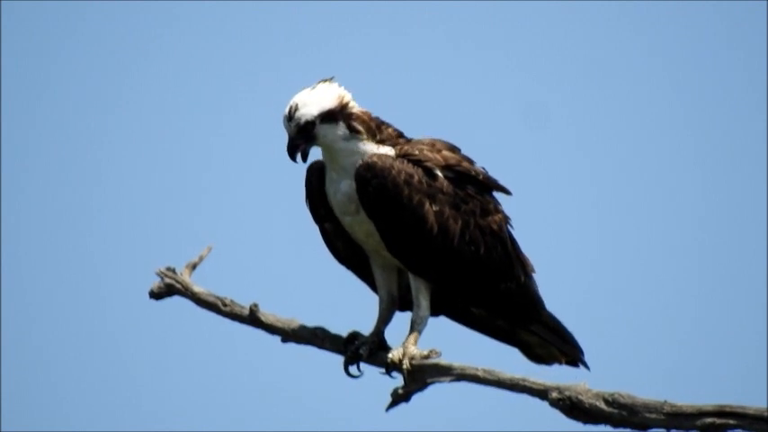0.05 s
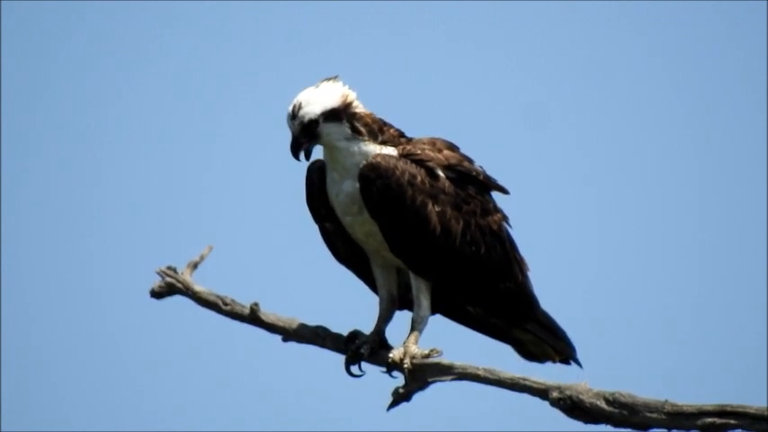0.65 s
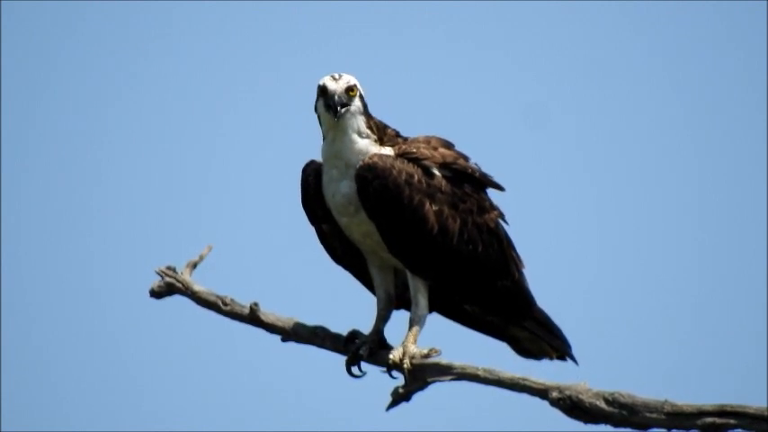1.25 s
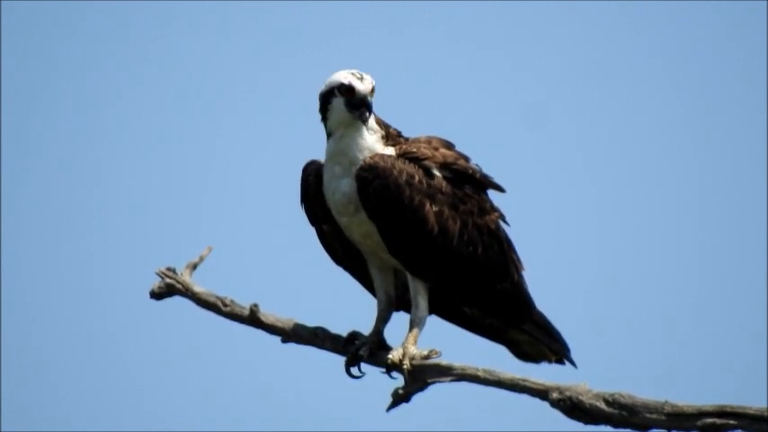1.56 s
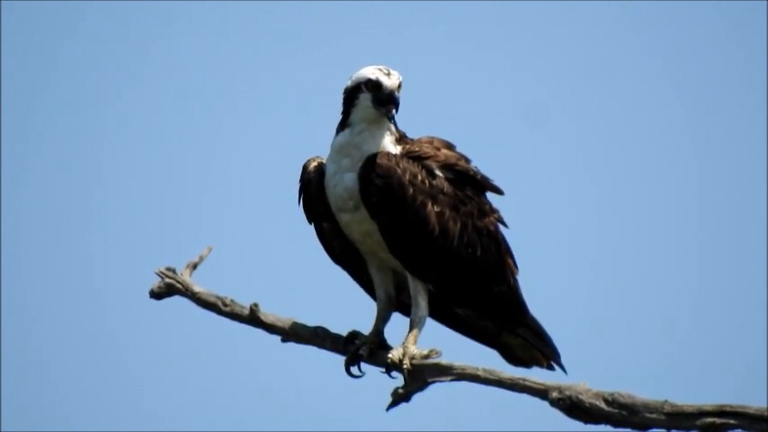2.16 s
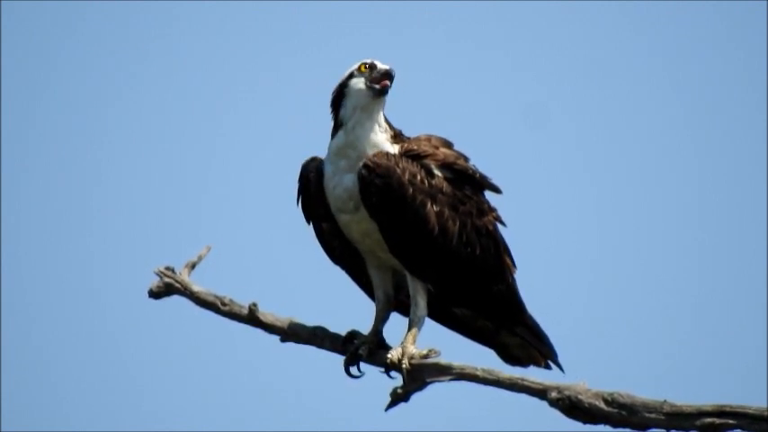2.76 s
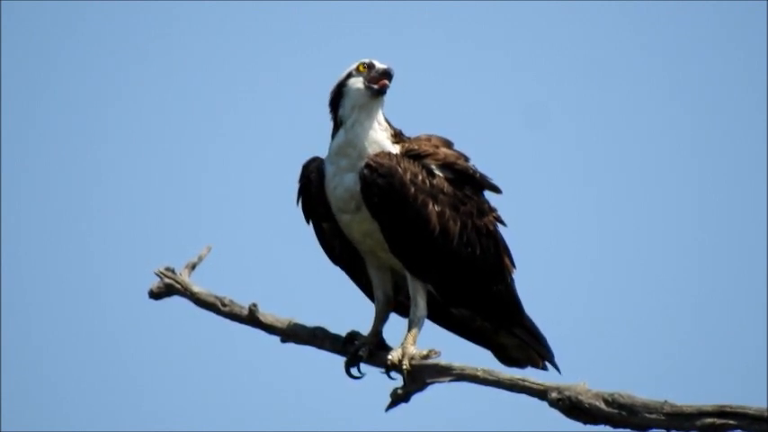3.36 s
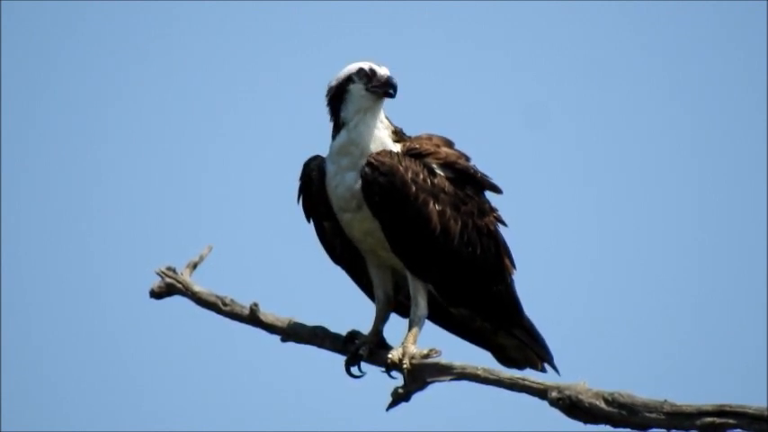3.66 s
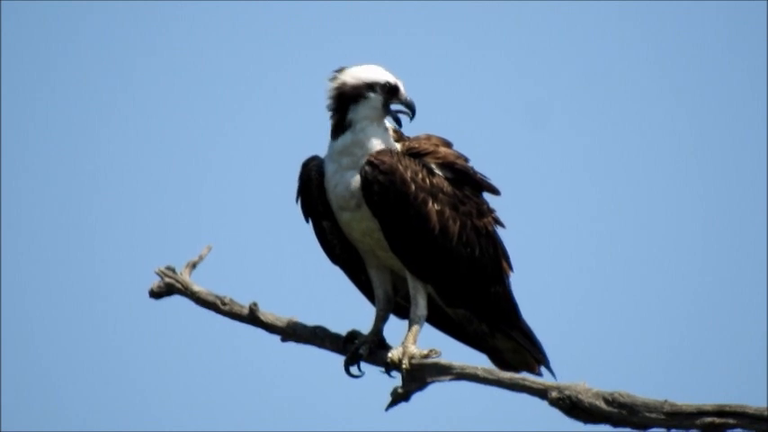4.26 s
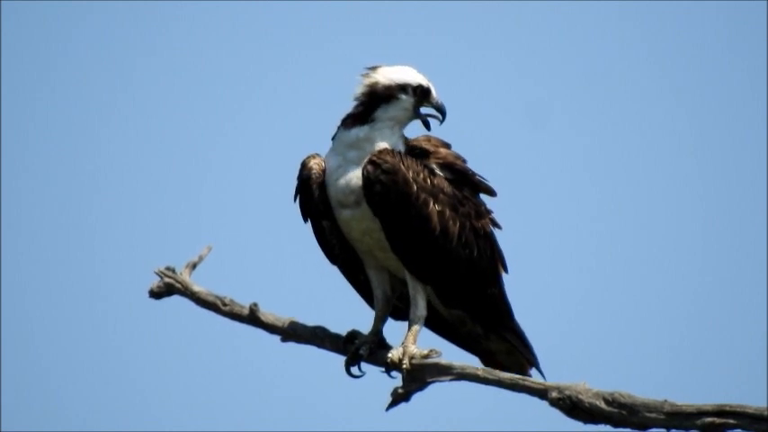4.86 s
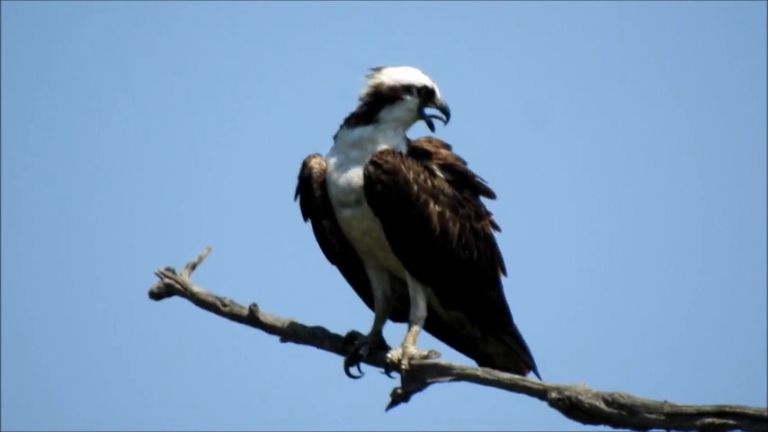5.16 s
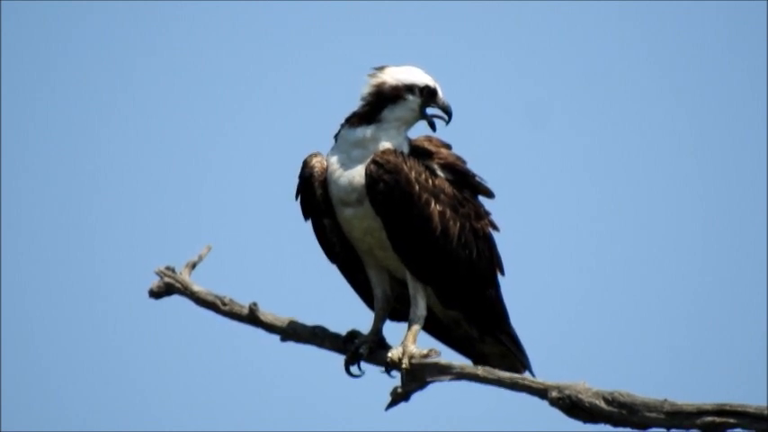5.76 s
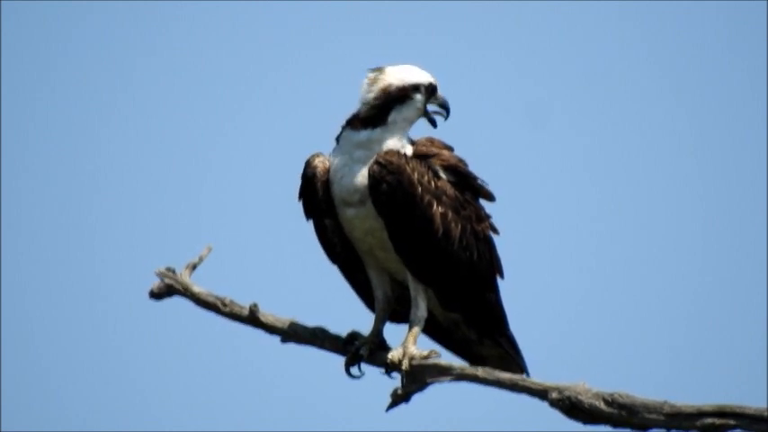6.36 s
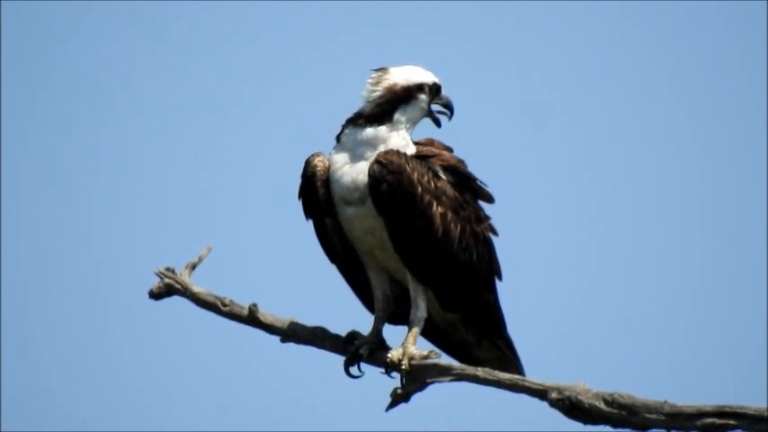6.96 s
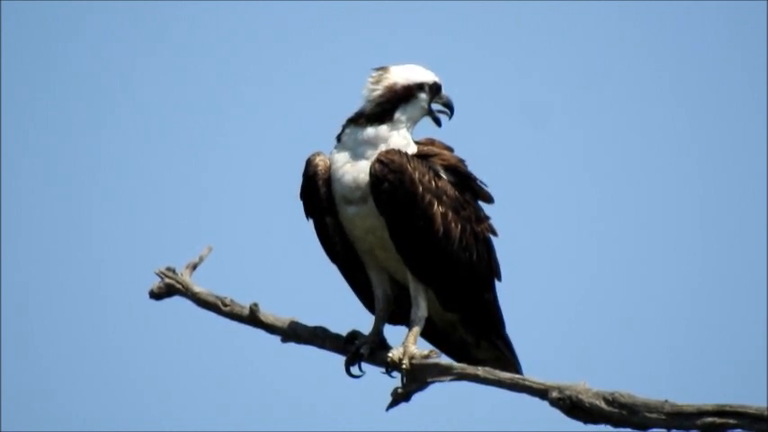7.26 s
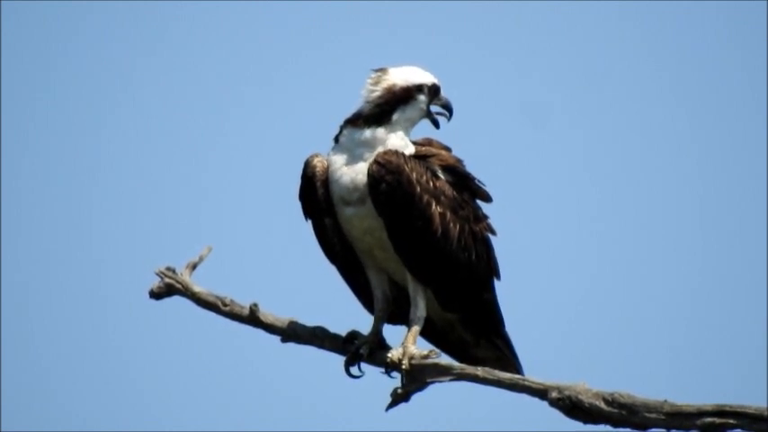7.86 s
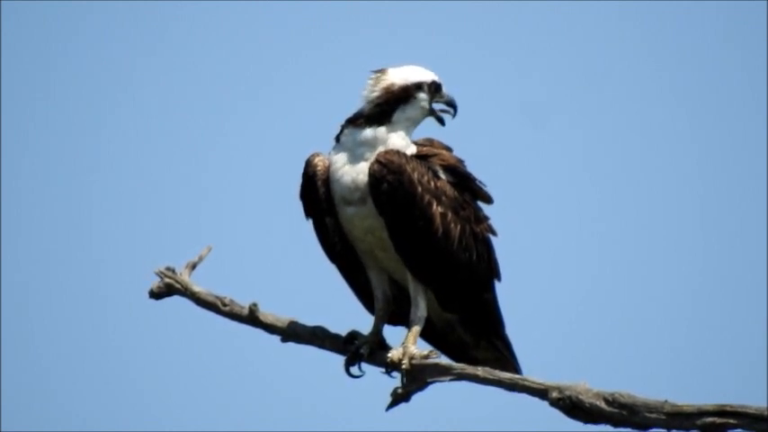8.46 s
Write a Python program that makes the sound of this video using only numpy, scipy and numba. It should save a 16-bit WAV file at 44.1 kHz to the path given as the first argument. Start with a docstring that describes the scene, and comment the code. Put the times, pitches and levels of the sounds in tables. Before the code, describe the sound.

Hoarse bird squawks and rattling croaks come at intervals, with steady high insects, a faint distant engine and low wind buffets.

```python
"""Large birds call outdoors on a summer day: short harsh squawks, and longer croaks, most of which
start as a clear note and break into a rasp. Membranes in the syrinx swing regularly for the note
and slap unevenly for the rasp; throat and beak resonate. Insects buzz high in the grass with strokes
of their wings, a far engine drones under a soft hiss of air, and gusts thump on the microphone.
Later come two faint calls from farther off and a few tiny ticks."""
import sys
import numpy as np
from scipy import signal
from scipy.fft import rfft, irfft, next_fast_len
from scipy.io import wavfile
from scipy.ndimage import uniform_filter1d
from numba import njit

SR = 44100
rng = np.random.default_rng(int(sys.argv[2]) if len(sys.argv) > 2 else 0)


def generate_wav(sig):
    """Save sig (samples, or channels by samples) to the path in sys.argv[1] as 16-bit PCM at SR."""
    pcm = np.round(np.clip(np.atleast_2d(sig).T, -1, 1) * 32767).astype(np.int16)
    wavfile.write(sys.argv[1], SR, pcm)


N = 383669
T = np.arange(N) / SR


def from_db(db):
    """Decibels to gain."""
    return 10 ** (np.asarray(db) / 20)


def rms_one(x):
    """Scale to unit power."""
    return x / np.sqrt(np.mean(x ** 2) + 1e-20)


def at_hz(points, hz):
    """Read a curve on a log-frequency axis."""
    f, value = np.transpose(points)
    return np.interp(np.log(np.maximum(hz, 1)), np.log(f), value)


def gate(start, end, fade_s):
    """Open between two times, with linear fades."""
    return np.clip(np.minimum(T - start, end - T) / fade_s, 0, 1)


def envelope(start, length, attack_s, release_s, swell_db=0, sag_db=0):
    """Attack, a hold that arches and sags, then a dying release."""
    out = np.zeros(N)
    now = slice(*np.searchsorted(T, [start, start + length + 10 * release_s]))
    age = T[now] - start
    part = np.minimum(age / length, 1)
    hold = from_db(swell_db * (np.sin(np.pi * part) - 1) - sag_db * part)
    out[now] = np.minimum(age / attack_s, 1) * hold * np.exp(-np.maximum(age - length, 0) / release_s)
    return out


def drift(rate_hz):
    """A smooth random modulator of unit power."""
    knots = np.arange(0, T[-1] + 1, 1 / (2 * rate_hz))
    values = np.random.default_rng(rng.integers(2 ** 31)).standard_normal(len(knots))
    return rms_one(np.interp(T, knots, values))


def colour(x, spectrum):
    """Apply an EQ curve, then scale to unit power."""
    size = next_fast_len(N)
    hz = np.arange(size // 2 + 1) * SR / size
    return rms_one(irfft(rfft(x, size) * from_db(at_hz(spectrum, hz)), size)[..., :N])


def field(spectrum, pan_db):
    """Stereo noise from all around, nearly mono in the bass and wide in the treble."""
    # likeness of the two ears: f/Hz, correlation
    likeness = [(50, 0.76), (140, 1), (330, 0.82), (800, 0.56), (2000, 0.18), (4500, 0.084), (6500, -0.081),
                (8000, -0.22), (15000, 0.23)]
    size = next_fast_len(N)
    alike = np.clip(at_hz(likeness, np.arange(size // 2 + 1) * SR / size), -1, 1)
    noise = rfft(rng.standard_normal((2, size)))
    mid, side = irfft(noise * np.sqrt([1 + alike, 1 - alike]), size)[:, :N]
    return colour(np.array([mid + side, mid - side]), spectrum) * from_db([[pan_db / 2], [-pan_db / 2]])


def far_engine():
    """A distant engine: a wavering low hum in a rumble that slowly grows."""
    # rumble EQ: f/Hz, level/dB
    rumble_eq = [(20, -34), (32, -8.5), (48, -3.5), (70, -3.5), (100, -1.5), (125, -4), (165, -5.5),
                 (200, -8), (250, -23.5), (300, -25), (360, -26.5), (500, -33), (700, -39.5), (1500, -120)]
    hum_hz, rise_db_per_s = 96, 0.5
    hum_gain = from_db(-37.5 + 0.94 * drift(7.7))
    hum = hum_gain * np.sin(2 * np.pi * np.cumsum(hum_hz + 0.5 * drift(2.8)) / SR)
    return hum + from_db(-39 + rise_db_per_s * T) * field(rumble_eq, pan_db=-1.75)


def open_air():
    """A soft, steady bed of broad hiss."""
    # air EQ: f/Hz, level/dB
    air_eq = [(300, 0), (600, 8.5), (900, 9.5), (1200, 1.5), (1700, 2.5), (2200, 0.5), (3400, 0.5),
              (4500, 5), (6500, 4), (9500, -3), (11000, -5.5), (15500, -12.5)]
    return from_db(-55.5) * field(air_eq, pan_db=-.6)


def wing_strokes(per_s, hz, sweep, duty, jitter, scratch):
    """Each stroke of an insect's file sings a short scratchy tone that falls in pitch."""
    place = (np.cumsum(per_s * (1 + jitter * drift(12))) / SR) % 1 - .5
    pitch = hz * (1 - sweep * place + scratch * drift(500))
    return rms_one(np.exp(-(place / duty) ** 2) * np.sin(2 * np.pi * np.cumsum(pitch) / SR))


def insects():
    """A dense chorus, one nearer chirper that fades down, and one lower buzzer in bouts."""
    # chorus EQ: f/Hz, level/dB
    chorus_eq = [(3880, -38), (6600, -12.5), (7270, 6.5), (8020, 10), (8430, 4), (9280, -10.5),
                 (10000, -22), (13000, -55), (22000, -120)]
    # the buzzer's bouts: start/s, end/s, level/dB
    buzzes = [(.28, 2.55, -63), (3.05, 4.1, -65.5), (4.82, 5.2, -66), (6.15, 7.55, -67), (7.7, 8.2, -67)]
    chorus = from_db(-47 + 0.74 * drift(40)) * field(chorus_eq, pan_db=-2.5)
    chirper = wing_strokes(per_s=9.45, hz=7520, sweep=0.076, duty=0.14, jitter=0.015, scratch=0.0079)
    chirper *= from_db(np.interp(T, [2.8, 4.5], [-58, -66]))
    bouts = sum(from_db(db) * gate(start, end, fade_s=0.07) for start, end, db in buzzes)
    flutter = from_db(2.1 * drift(30))
    buzzer = wing_strokes(per_s=74, hz=5050, sweep=0.16, duty=0.45, jitter=.14, scratch=.016)
    return chorus + chirper + bouts * flutter * buzzer


def wind():
    """Lumpy turbulence, separate at each microphone port, with single eddies that thump."""
    # gusts: start/s, length/s, left level/dB, right level/dB
    gusts = [(2.479, 0.21, -37, -29), (3.73, 0.062, -32, -36), (4.276, 0.31, -41, -31),
             (5.528, .08, -18.5, -31), (5.715, 0.595, -28, -20.5), (6.574, 0.26, -34, -32),
             (8.606, 0.19, -33.5, -27.5)]
    # turbulence EQ: f/Hz, level/dB
    wind_eq = [(20, -34), (42, -6), (75, 3.5), (125, -6.5), (180, -10), (250, -23.5), (400, -61),
               (900, -84), (3000, -78)]
    # eddies: t/s, port (0 left, 1 right), envelope peak/dB
    buffets = [(3.778, 1, -13), (4.346, 1, -5.5), (4.347, 0, -17), (4.548, 1, -9), (5.571, 0, -4.5),
               (5.602, 1, -5.5), (5.732, 1, -8.5), (5.883, 1, -7.5), (5.94, 1, -7), (6.07, 1, -3.5),
               (6.128, 1, -4.5), (6.398, 1, -11), (6.617, 0, -13), (6.893, 1, -8.5), (8.644, 1, -11)]
    breeze_db, buffet_hz = -51.5, 106.3
    flow = from_db(breeze_db)
    for start, length, left_db, right_db in gusts:
        gust = envelope(start, length, attack_s=0.031, release_s=0.047, swell_db=-1.5)
        flow = flow + from_db([[left_db], [right_db]]) * gust
    out = flow * colour(rng.standard_normal((2, N)), wind_eq) * from_db(1.8 * drift(12) - 1.5)
    for s, port, db in buffets:
        near = np.abs(T - s) < .1
        cycles = (T[near] - s) * buffet_hz
        thump = np.cos(2 * np.pi * cycles + rng.uniform(0, 2 * np.pi)) / np.cosh(cycles / 0.28)
        out[int(port), near] += from_db(db) * thump
    return out


def current_call(calls):
    """At each moment: the share of the latest call that has passed, then its columns after length."""
    table = np.array(calls)
    latest = np.maximum(np.searchsorted(table[:, 0], T) - 1, 0)
    start, length, *columns = table.T[:, latest]
    return [np.clip((T - start) / length, 0, 1), *columns]


def syrinx(per_s, jitter, uneven_db, air, closing, tone_hz, tone):
    """One membrane slaps unevenly; each opening lets out a puff of air and the other's hoarse tone."""
    cycles = np.cumsum(per_s * np.exp(jitter * drift(140) + .05 * drift(14))) / SR
    count = cycles.astype(int)
    slaps = colour(np.diff(count, prepend=0).astype(float), [(1800, 4.0), (6000, 1.5)])
    phase = 2 * np.pi * np.cumsum(tone_hz * (1 + .035 * drift(110) + .012 * drift(9))) / SR
    hoarse = sum(np.sin(k * phase + rng.uniform(0, 2 * np.pi)) / np.sqrt(k) for k in range(1, 16))
    breath = colour(rng.standard_normal(N), [(1200, 4.0), (4000, -3.5)])
    flow = air * breath + tone * rms_one(hoarse)
    opening = rms_one(np.exp(-(cycles % 1) / closing))
    return (slaps + opening * flow) * from_db(uneven_db * rng.standard_normal(N)[count])


def comb(x, spacing_hz, depth):
    """A close reflection combs the spectrum into evenly spaced ribs."""
    return x + depth * np.interp(T - 1 / spacing_hz, T, x, left=0)


@njit
def resonate(x, centre, width):
    """A moving band-pass of gain one; centre and width in cycles per sample."""
    y = np.zeros(len(x))
    for i in range(2, len(x)):
        r = np.exp(-np.pi * width[i])
        drive = (1 - r * r) / 2 * (x[i] - x[i - 2])
        y[i] = drive + 2 * r * np.cos(2 * np.pi * centre[i]) * y[i - 1] - r * r * y[i - 2]
    return y


def voice(sound, resonances, eq, body_gain, top_gain):
    """The throat colours the pulses; body and bright top are levelled, then each follows the effort."""
    for hz, width_hz, db in resonances:
        sound = sound + from_db(db) * resonate(sound, hz / SR, np.full(N, width_hz / SR))
    sound = colour(sound, eq)
    body = signal.sosfiltfilt(signal.butter(4, 2900, fs=SR, output="sos"), sound)
    body, top = [v / np.sqrt(uniform_filter1d(v * v, size=1100) + 1e-9) for v in (body, sound - body)]
    return body_gain * body + top_gain * top


def squawks():
    """Fast chaotic pulses through an open beak; two resonances draw together as the throat tightens."""
    # squawks: start/s, length/s, level/dB, relative treble/dB, swell/dB, tightest moment/s,
    # first and second resonance at that moment/Hz, first and second resonance at the end/Hz
    calls = [(.556, 0.081, -42.5, 2.5, 2, .58, 1620, 3450, 1350, 3870),
             (.730, 0.14, -37.5, 1.5, 14.6, 0.795, 2240, 2550, 1820, 3800),
             (1.305, 0.085, -44.5, 3.5, 2.5, 1.335, 1720, 3420, 1310, 3850),
             (3.114, 0.15, -43.5, 2.5, 3.8, 3.165, 2170, 2930, 1780, 4300),
             (3.797, 0.15, -42.5, 2.5, 1.9, 3.88, 1470, 2980, 2200, 4000),
             (4.491, 0.16, -45.5, 1, 4, 4.575, 2360, 3180, 1780, 3750)]
    # squawk EQ: f/Hz, level/dB
    squawk_eq = [(200, -10), (350, 2), (620, -7), (900, -2), (1200, -1), (1700, -1), (2600, -4), (3500, -5),
                 (4500, -1), (6250, 2), (7300, -2), (8500, -14), (10500, -28), (15000, -35)]
    opening_hz, third_end_hz = (1830, 3450, 5840), 6540  # resonances of beak and throat
    pinch_s, crescendo = 0.038, 0.73  # the top grows by this share of the swell
    part, *_, tight_s, first_tight, second_tight, first_end, second_end = current_call(calls)
    ending_hz = (first_end, second_end, third_end_hz)
    first, second, third = [a + (b - a) * part for a, b in zip(opening_hz, ending_hz)]
    pinch = np.exp(-((T - tight_s) / pinch_s) ** 2)
    first += pinch * (first_tight - first)
    second += pinch * (second_tight - second)
    body, top = np.zeros((2, N))
    for start, length, db, treble_db, swell_db, *_ in calls:
        body += from_db(db) * envelope(start, length, attack_s=0.016, release_s=0.014, swell_db=swell_db)
        # the bright top comes later, arches more and lingers
        top += from_db(db + treble_db) * envelope(
            start, length, attack_s=0.038, release_s=0.016,
            swell_db=swell_db + 2, sag_db=-crescendo * swell_db)
    source = syrinx(per_s=300, jitter=.13, uneven_db=1.8, air=2.3, closing=.9, tone_hz=420, tone=.45)
    throat = [(first, 300, 12), (second, 360, 12), (third, 480, 7)]
    return voice(comb(source, spacing_hz=349.5, depth=0.27), throat, squawk_eq, body, top)


def croaks():
    """Slow rattling pulses in a narrower throat; rattle, resonances and level sink as air runs out."""
    # croaks: start/s, length/s, level/dB, relative treble/dB, swell/dB, sag/dB,
    # first resonance width/Hz, second resonance/Hz, pulse rate/Hz, roughness (0-1)
    calls = [(1.530, .43, -41, -6, 7, 3, 170, 3720, 230, .5),
             (2.390, .33, -39, -9.5, 3.5, 7.5, 198, 3340, 133, 0.69),
             (3.940, 0.16, -42.5, -8.5, 3, 9.5, 280, 3770, 174, 0.95),
             (5.820, .25, -46.5, -5, 5.5, 5, 320, 2947, 165, .9),
             (6.625, 0.48, -47.5, -6, 4, 0, 440, 2866, 190, 1)]
    # croak EQ: f/Hz, level/dB
    croak_eq = [(200, -4), (420, 0), (600, 2), (850, 5.5), (1050, -8), (1400, 4), (1700, -1), (2150, -7),
                (2900, -2.5), (3400, -6.5), (3900, -6), (4500, 1.5), (5400, -2), (6500, 4.5), (10000, -22)]
    attack_s, top_attack_s, release_s = 0.022, 0.041, 0.015
    first_hz, throat_sag, rasp_slowing = 1284, 0.043, .33
    part, *_, width_hz, second_hz, per_s, rough = current_call(calls)
    body, top = np.zeros((2, N))
    for start, length, db, treble_db, swell_db, sag_db, *_ in calls:
        body += from_db(db) * envelope(start, length, attack_s, release_s, swell_db, sag_db)
        # the top comes later and fades sooner
        top_shape = envelope(start, length, top_attack_s, release_s, swell_db, sag_db + 2.5)
        top += from_db(db + treble_db) * top_shape
    source = syrinx(per_s * (1 - rasp_slowing * part * part), jitter=.05 * rough, uneven_db=1.8,
                    air=1.3 * rough, closing=.65, tone_hz=452, tone=.6 * rough)
    sag = 1 - throat_sag * part
    ring_db = 15 - np.log2(width_hz / 270)  # a narrower throat rings more
    throat = [(first_hz * sag, width_hz, ring_db), (second_hz * sag, 300, ring_db + 0.5)]
    throb = from_db(2.65 * drift(14))  # the effort is unsteady
    return voice(comb(source, spacing_hz=226, depth=.38), throat, croak_eq, body * throb, top)


def clear_notes():
    """Before a croak breaks up the membranes swing regularly: a fundamental, then clean overtones."""
    # one contour a note: t/s, pitch/Hz, fundamental level/dB
    notes = [
        [(2.322, 717, -65), (2.33, 748, -51), (2.34, 804, -53), (2.358, 803, -50), (2.386, 846, -41),
         (2.4, 857, -41), (2.41, 845.0, -50)],
        [(3.708, 810, -54), (3.72, 790, -50), (3.732, 838, -46), (3.804, 816, -40), (3.84, 830, -42),
         (3.85, 818.9, -44)],
        [(5.6, 930, -67), (5.62, 978, -49), (5.668, 1045, -76), (5.706, 1050, -57), (5.744, 1054, -57),
         (5.772, 1076, -45.5), (5.842, 1083, -69)],
        [(6.63, 917, -72), (6.64, 975, -60), (6.65, 992.2, -67), (6.654, 995, -59), (6.662, 1043, -64),
         (6.682, 1056, -63), (6.7, 1069, -72)],
    ]
    # each note's overtones: level/dB, crescendo/dB, throat resonance at the start/Hz, at the end/Hz
    stacks = [(-50, 1, 3080, 3400), (-55.5, 8.5, 4000, 3400), (-56.5, -5.5, 5400, 4350),
              (-66.5, 3, 4200, 5700)]
    # overtone EQ of the low and of the high notes: f/Hz, level/dB
    low_eq = [(1650, 5), (2480, -9.5), (3330, -8), (4150, -17.5), (4950, -18), (5800, -9), (6600, -5),
              (7600, -24)]
    high_eq = [(2100, -4.5), (3200, 1), (4300, -1), (5300, -1), (6400, 3.5), (7500, -9), (9000, -30)]
    attack_s, overtone_attack_s, release_s = .008, 0.026, 0.0088
    waver, flutter = 1 + 0.0032 * drift(70), from_db(1.7 * drift(50))
    out = np.zeros(N)
    for contour, stack, eq in zip(notes, stacks, [low_eq, low_eq, high_eq, high_eq]):
        s, pitch, level = np.transpose(contour)
        overtones_db, crescendo_db, throat_from, throat_to = stack
        sounding = gate(s[0] - attack_s, s[-1] + release_s, attack_s)
        now = sounding > 0
        hz = np.interp(T[now], s, pitch)
        throat_hz = np.interp(T[now], s[[0, -1]], [throat_from, throat_to])
        phase = 2 * np.pi * np.cumsum(hz * waver[now]) / SR
        tone = from_db(np.interp(T[now], s, level)) * np.sin(phase)
        bloom = envelope(s[0], s[-1] - s[0], overtone_attack_s, release_s, sag_db=-crescendo_db)[now]
        for k in range(2, 10):
            # an overtone swells as the resonance passes over it, and flickers on its own
            ring_db = 11 / (1 + ((k * hz - throat_hz) / 330) ** 2) - 2
            db = overtones_db + at_hz(eq, k * hz) + ring_db + 1.2 * drift(10)[now]
            tone += bloom * from_db(db) * np.sin(k * phase)
        out[now] += np.sqrt(2) * (sounding * flutter)[now] * tone
    return out


def far_birds():
    """Distance blurs a hissing call and a croak into soft bands of noise."""
    # the two distant calls: start/s, length/s, level/dB
    far_call = (5.13, 0.29, -53)
    far_croak = (7.58, .34, -66)
    # EQ of the hissing call: f/Hz, level/dB
    hiss_eq = [(2500, -14), (3800, 3), (5000, 4), (5700, 4), (6500, -9), (8000, -25)]
    hiss = field(hiss_eq, pan_db=0.5)
    croak = colour(rng.standard_normal(N), [(600, -12), (1000, -4), (1700, 8), (2100, -19), (5000, -28)])
    return sum(from_db(db) * envelope(start, length, attack_s=0.072, release_s=0.16) * noise
               for (start, length, db), noise in [(far_call, hiss), (far_croak, croak)])


def ticks():
    """Tiny dry snaps of high noise, a few milliseconds long."""
    # snaps: t/s, level/dB
    snaps = [(5.9525, -44), (5.9671, -44), (6.9227, -49), (7.1774, -47), (7.2659, -48), (7.3444, -50),
             (7.5444, -49), (7.7544, -52), (7.7937, -49)]
    bursts = sum(from_db(db - 0.5) * np.exp(-np.abs(T - s) / 0.0021) for s, db in snaps)
    return bursts * colour(rng.standard_normal(N), [(3500, -26), (5000, 2), (6800, 3), (9000, -25)])


def foliage(x, wet_db, t60):
    """Leaves scatter a short thin tail, different in each ear."""
    t = T[:SR // 2]
    tail = rng.standard_normal((2, len(t))) * from_db(-60 * t / t60) * (t > .004)
    tail /= np.sqrt(np.sum(tail ** 2, axis=1, keepdims=True))
    return x + from_db(wet_db) * signal.fftconvolve(x[None], tail, axes=1)[:, :N]


def scene():
    """Birds in front; engine, air, insects and wind all around."""
    foreground = foliage(squawks() + croaks() + clear_notes() + ticks(), wet_db=-15, t60=.4)
    return foreground + far_engine() + open_air() + far_birds() + insects() + wind()


def record(dry):
    """A steep low-pass takes off the very top."""
    cutoff_hz = 15700
    return signal.sosfilt(signal.ellip(12, .1, 90, cutoff_hz, fs=SR, output="sos"), dry)


dry = scene()
out = record(dry)
generate_wav(out)
```